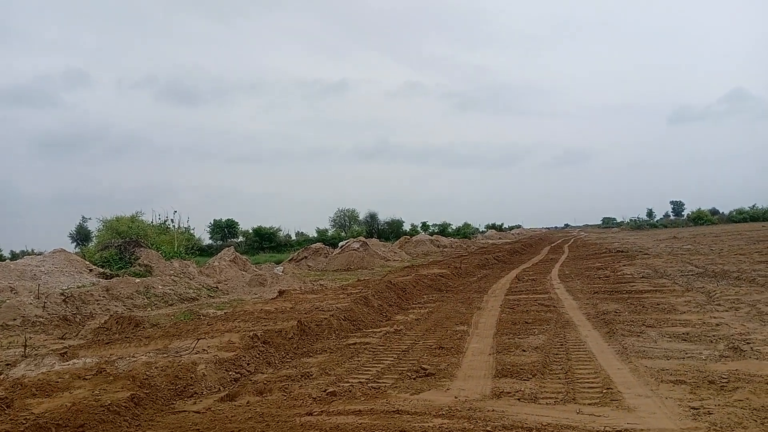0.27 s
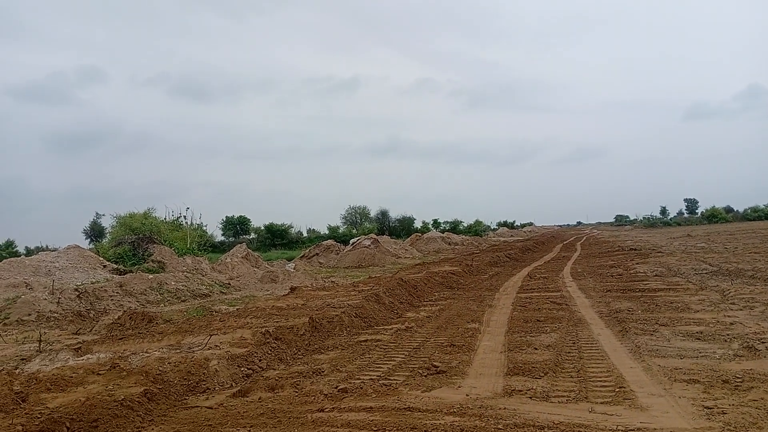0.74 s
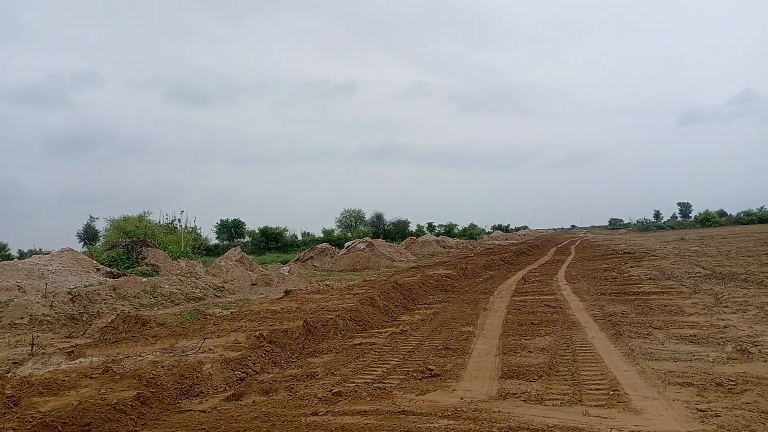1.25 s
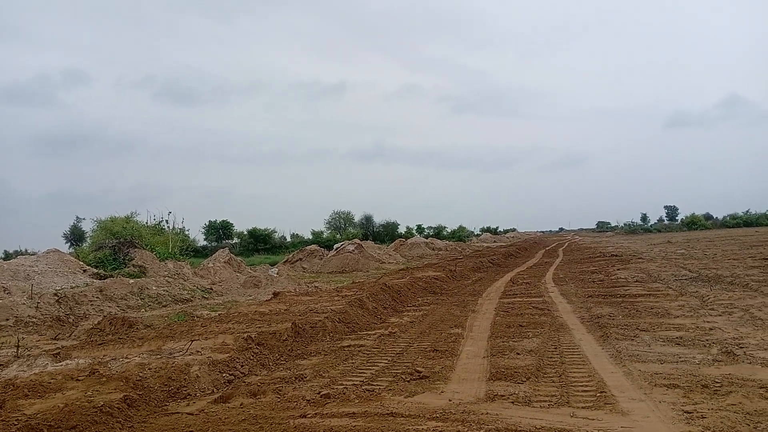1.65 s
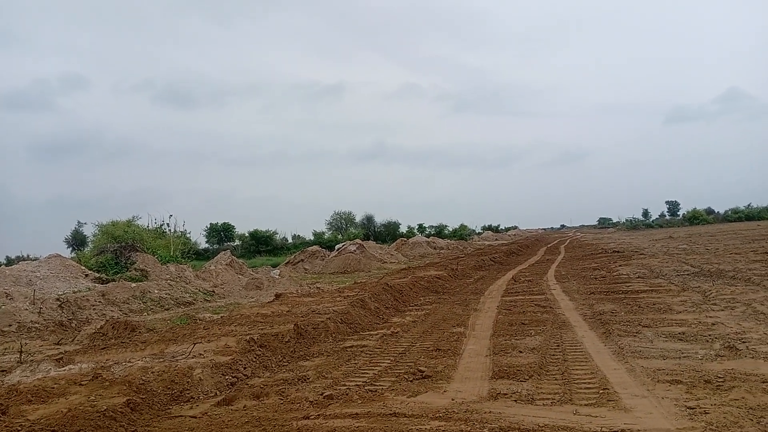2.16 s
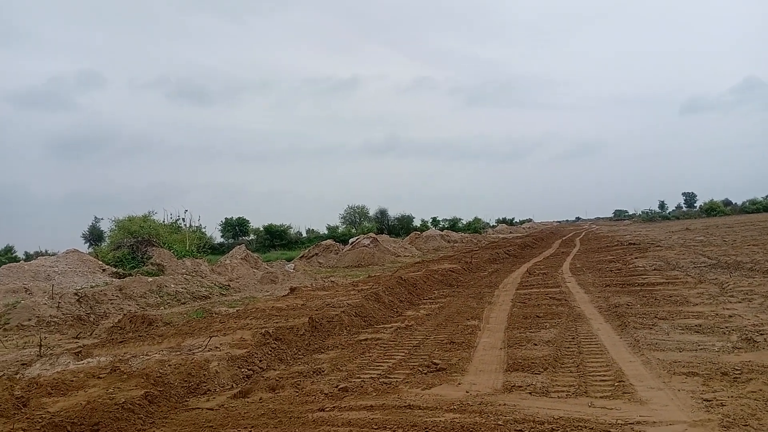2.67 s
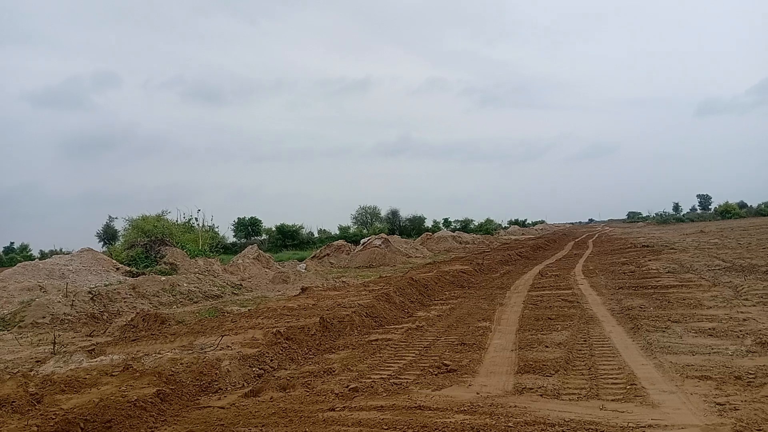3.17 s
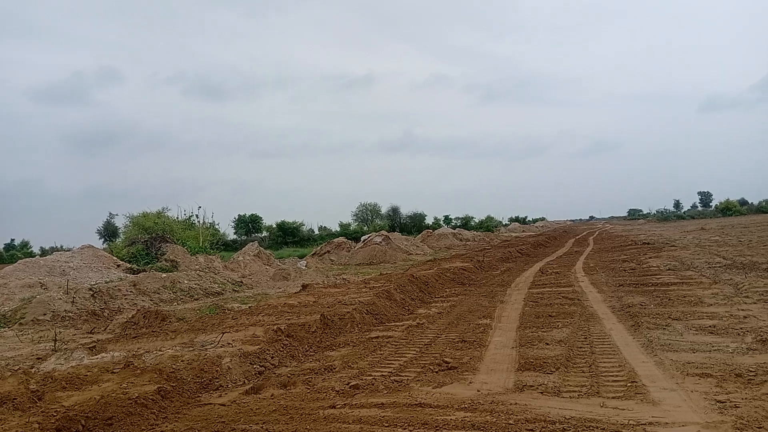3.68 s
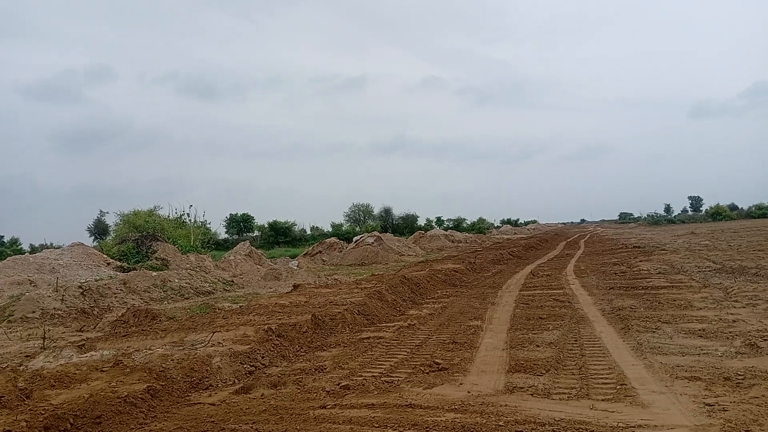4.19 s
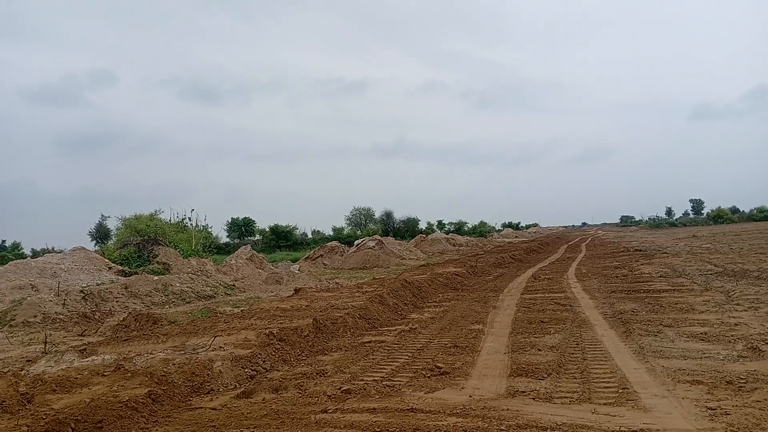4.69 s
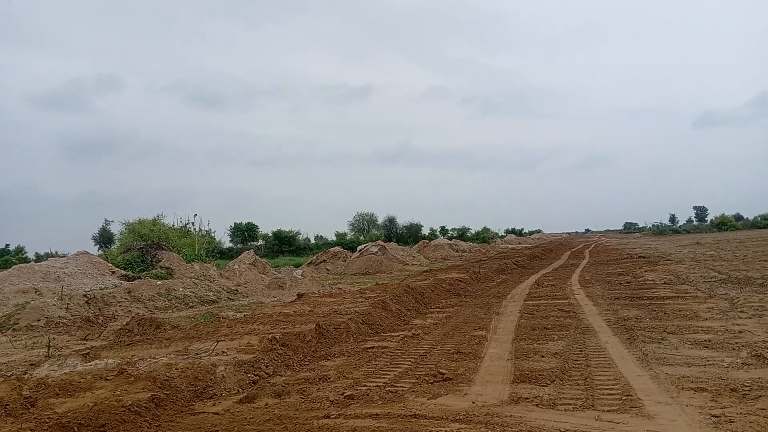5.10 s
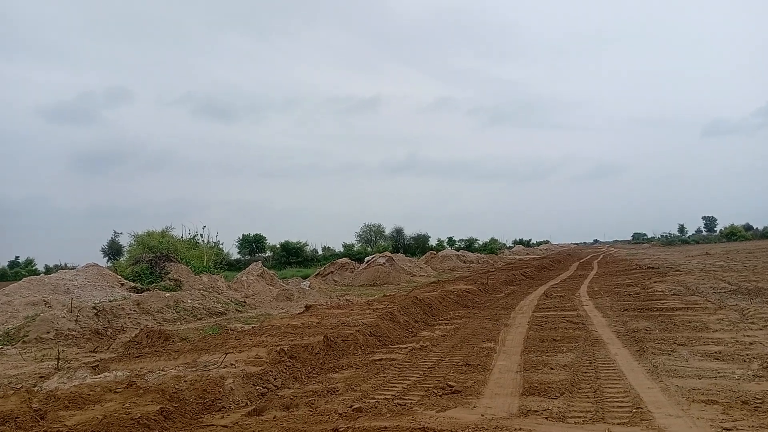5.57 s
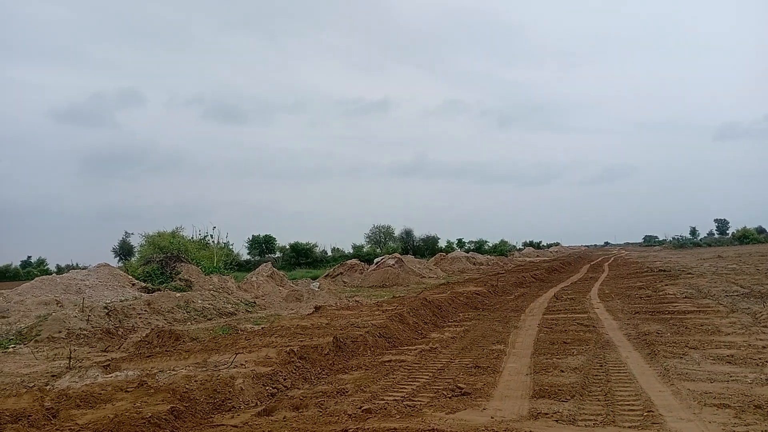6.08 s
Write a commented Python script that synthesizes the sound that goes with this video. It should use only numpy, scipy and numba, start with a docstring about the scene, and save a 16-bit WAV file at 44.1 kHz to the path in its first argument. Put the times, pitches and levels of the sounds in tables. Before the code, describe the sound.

Low rough diesel throb with hissy mechanical clatter, then sharp metallic clanking and rattling in uneven clusters, heard dully across open ground.

```python
"""Tracked earthmover at idle

Uneven diesel firings excite the exhaust resonances, and filtered noise makes the hiss of valve gear
and fan in the hood. Bursts of gritty noise are the crashes of track links and loose steel; they
drive the plates of the frame, some of which ring on as decaying sines. A dull microphone hears it
all, and a steep low-pass leaves nothing above 15.7 kHz."""
import sys
import numpy as np
from scipy import signal
from scipy.fft import rfft, irfft, next_fast_len
from scipy.io import wavfile
from scipy.ndimage import uniform_filter1d, minimum_filter1d
from numba import njit

SR = 44100
rng = np.random.default_rng(int(sys.argv[2]) if len(sys.argv) > 2 else 0)


def transcribe(u):
    """Save the signal u as a 16-bit wav file named by the first command-line argument.

    u: samples, shape (n,) or (channels, n), limited to [-1, 1]; the rate is SR.
    q: integer samples, one column per channel.
    """
    v = np.clip(np.atleast_2d(u).T, -1, 1)
    q = np.round(v * 32767).astype(np.int16)
    wavfile.write(sys.argv[1], SR, q)


N = 279594

# crashes of steel: t/s, level/dB, then trims against it: thud/dB, boom/dB, bite/dB, crack/dB;
# clang f/Hz, rattle t60/s
CRASHES = [(1.097, -28.5, -13.5, -8.5, -8, -8, 1690, 0.089), (1.108, -15, -16, -17.5, -12, 2, 2270, 0.083),
           (1.126, -23.5, -11, -15, -23.5, -6, 785, .3), (1.314, -2.5, -5.5, -22.5, -40, 0, 690, .15),
           (1.358, -12, -20, -17.5, -41, 9.5, 745, .17), (1.481, -6, -12, -11.5, -25, 1, 1580, 0.29),
           (1.522, -15, -21.5, -16, -10, -3, 1070, 0.32), (1.575, -12.5, -22, -23, -0.5, -10.5, 1030, 0.11),
           (1.695, -18.5, -10.5, -17, -2, 3, 1150, 0.23), (1.727, -5.5, -28, -15.5, -7, 1.5, 1730, .19),
           (1.923, -26, -17, -8, -12, -4, 1550, 0.17), (1.946, -26.5, -24.5, -25, -8, 5.5, 1360, 0.12),
           (2.275, -28, -3.5, -21, -14, 3.5, 1760, 0.14), (2.318, -13, -13, -21.5, -26, 11, 1760, .21),
           (2.349, -26, -6.5, -4.5, -7.5, -6.5, 1800, 0.34), (2.382, -6, -27.5, -25.5, -7.5, 2, 1840, 0.13),
           (2.472, -20, -17.5, -14, -18, 5, 1710, 0.18), (2.548, -29, -13, -9.5, 1.5, -3.5, 1640, .22),
           (2.581, -29.5, -9.5, -19.5, -13, -3, 1530, 0.14),
           (2.76, -24.5, -21.5, -1, -23.5, -12, 2050, 0.17), (2.783, -21.5, -14, -23.5, -1.5, 6, 1800, .14),
           (2.825, -15.5, -13.5, -14.5, -33, -10, 1640, 0.4), (2.847, -14.5, -11, -15.5, -4, 3, 2170, 0.2),
           (2.903, -16.5, -28.5, -13.5, -14.5, 2.5, 1940, 0.31),
           (2.972, -18.5, 0.5, -25.5, -4.5, 11.5, 1860, 0.091),
           (3.019, -1, -19, -14, -15, -4.5, 1720, 0.091), (3.032, -3, -19.5, -22, -2, 1, 1103, 0.12),
           (3.071, -12, -7.5, -24.5, 1.5, -5.5, 1650, 0.19), (3.093, -15, -17.5, -20.5, -11, 1, 1880, 0.13),
           (3.118, -20, -14.5, -11, 7.5, 4, 1970, 0.17), (3.327, -12.5, -24.5, -15, -17, -5, 1144, .14),
           (3.344, -10.5, -22, -30.5, -27, -5, 1760, .13), (3.428, -16, -15.5, -11, -11, 0.5, 1920, .14),
           (3.499, -23, -16, -15.5, 0, 2, 1060, .2), (3.549, -21.5, -6.5, -17.5, -18, 0, 1070, 0.17),
           (4.135, -23, -1, -19, -4.5, -3, 1920, 0.084), (4.236, -21.5, -8, -10, -25, 4, 963, 0.54),
           (4.279, -18, -11, -13.5, -25, 5, 1290, 0.13), (4.633, -20.5, -11.5, -5.5, -16, -3, 1530, 0.24),
           (4.726, -15, -15.5, -3.5, -26, -11.5, 970, 0.45), (4.804, -2.5, -30, -10, -19, -17, 1610, 0.16),
           (4.857, -21.5, -3.5, -9.5, -25, -3, 704, .25), (4.966, -13.5, -12.5, -4, -23, 4, 1770, 0.13),
           (4.989, -12, -16.5, -11.5, -32, -13, 1030, 0.12), (5.025, -10, -16, -10, -33, 4.5, 1286, 0.24),
           (5.101, -29, -10.5, -9, -12, 15, 924, 0.92), (5.293, -30, -8.5, 0, -21, -5, 1110, 0.27),
           (5.339, -11, -18, -4, -33, -9, 880, 0.19), (5.43, -12.5, -18.5, -16, -8, 4.5, 870, .3),
           (5.479, -16.5, -21, -7.5, -20, -7, 983, 0.76), (5.513, -9, -30, -10.5, -22.5, 11.5, 730, 0.23),
           (5.639, -10, -10, -5, -23.5, -12, 684, .14), (5.66, -11, -26, -23.5, -15.5, -9, 668, 0.22),
           (5.726, -29.5, -16, -1.5, -26, 8, 614, 0.26), (5.797, -17.5, -17.5, -5.5, -15, -9, 990, .2),
           (5.815, -9.5, -19.5, -13, -18.5, -11, 1160, 0.23), (5.856, -7.5, -17, -20, -10, -1, 630, 0.37),
           (5.874, -15, -16.5, -1.5, -2.5, 13.5, 1840, .13), (5.91, -8, -16, -10, -24.5, -8, 990, .23),
           (5.947, -11, -10, -10.5, -24, 4, 1740, 0.08), (6.029, -6.5, -19.5, -9, -18.5, -11, 593, 0.3),
           (6.079, -6, -20.5, -14.5, -8.5, 11.5, 1790, .24), (6.107, -11, -19, -12.5, -26, 3, 1070, 0.28),
           (6.147, -14.5, -20, -25, -15, 12, 692, 0.44), (6.256, -6, -27.5, -8, 0, -3.5, 1130, 0.075),
           (6.279, -10.5, -23, -22, -10, 0.5, 1234, 0.68), (6.316, -8, -28, -11, -10, 9.5, 1860, .21)]
# modes of the frame and track plates: f/Hz, level/dB, free t60/s
PLATE_MODES = [(155, -4, .2), (217, -5, .2), (241, -6, 1.), (292, -6, .2), (345, -3, .5), (372, -5, 1.),
               (393, -4, .35), (440, -4, .3), (540, -5, .7), (623, -4, .6), (725, -4, .35), (882, -5, .3),
               (1000, -5, .15), (1100, -4, .25), (1150, -6, .3), (1220, -6, .2), (1550, -8, .12),
               (1715, -7, .15), (1900, -6, .12), (2080, -8, .12), (2400, -7, .1), (2690, -7, .18),
               (3000, -9, .07), (3350, -10, .07), (3570, -10, .12), (3800, -12, .08), (3960, -12, .25),
               (4200, -12, .06), (4380, -10, .35), (5250, -12, .08)]


def undb(db):
    """Level to amplitude: 20 dB is a factor of ten."""
    return 10 ** (np.asarray(db) / 20)


def unit(x):
    """Normalization of the root mean square to 1."""
    return x / np.sqrt(np.mean(x ** 2))


@njit
def svf(x, hz, width):
    """Second-order resonance: a state-variable band-pass with gain 1 at the centre."""
    y, band, low = np.empty(len(x)), 0., 0.
    g, damping = np.tan(np.pi * hz / SR), width / hz
    for i in range(len(x)):
        # the tiny offset keeps the state out of denormal numbers
        v = (band + g * (x[i] + 1e-18 - low)) / (1 + g * (g + damping))
        band = 2 * v - band
        low += 2 * g * v
        y[i] = damping * v
    return y


def walk(rate):
    """Slow random fluctuation: normal values held 1 / rate s, smoothed twice; spread near 1."""
    hold = int(SR / rate)
    steps = np.repeat(rng.standard_normal(N // hold + 1), hold)
    return 1.3 * uniform_filter1d(uniform_filter1d(steps, hold), hold)[:N]


def resonate(x, hz, width):
    """Forced resonance: one band-pass applied to x, scaled to unit rms."""
    return unit(svf(x, 1. * hz, 1. * width))


def noise_band(hz, width):
    """Band-limited noise: white noise through the same resonance twice, at unit rms."""
    once = svf(rng.standard_normal(N), 1. * hz, 1. * width)
    return resonate(once, hz, width)


def firings():
    """Jittered pulse train: integrated firing rate gives the phase, each whole turn one pulse."""
    # engine speed: t/s, firing rate f/Hz
    firing_rate = [(0, 73.4), (1.2, 72.6), (1.999, 73.8), (3.001, 75.52), (3.6, 76.26), (4.6, 76.4),
                   (6.34, 75.56)]
    jitter, scatter_db = 0.092, 3.5  # standard deviations: part of a firing interval, dB
    turns = np.cumsum(np.interp(np.arange(N) / SR, *np.transpose(firing_rate))) / SR
    timing, strength = rng.standard_normal((int(turns[-1]), 2)).T
    at = np.searchsorted(turns, np.arange(len(timing)) + jitter * timing)
    pulses = np.zeros(N)
    pulses[at] = undb(scatter_db * strength)
    return turns, pulses


def exhaust(turns, pulses):
    """Source and resonator: firing pulses and gas noise ring the pipe, over wavering engine lines."""
    # pipe resonances: f/Hz, width/Hz, level/dB
    pipe_modes = [(35, 27, -13.5), (72, 42.5, 0), (114, 66, 1.5), (190.2, 50, 0), (450, 25, -11),
                  (617.4, 14, -19)]
    # engine lines: multiple of the firing rate, mean level/dB against the exhaust
    engine_orders = [(1, -7), (6, -14.5)]
    puffs = rng.standard_normal(N) * undb(2.0 * walk(21))
    drive = unit(pulses) + puffs
    pipe = np.zeros(N)
    for k, (hz, width, db) in enumerate(pipe_modes):
        # neighbouring resonances alternate in sign
        pipe += (-1) ** k * undb(db) * resonate(drive, hz, width)
    lines = np.zeros(N)
    for order, db in engine_orders:
        phase = 2 * np.pi * order * turns + .8 * walk(12)
        lines += undb(db + 2 * walk(14)) * np.sin(phase)
    return unit(pipe) + lines


def hood_clatter(pulses):
    """Amplitude modulation: fluctuating noise bands of valve gear and fan throb with the firings."""
    # hood resonances: f/Hz, width/Hz, relative level/dB
    hood_modes = [(334, 830, -2), (736, 470, 2), (1105, 150, 0.5), (1820, 460, 4), (2450, 840, -7.5),
                  (3340, 390, -2.5), (5400, 1300, -3)]
    throb = 1 + 0.12 * resonate(pulses, 75, 75)
    shared = walk(9)
    clatter = np.zeros(N)
    for hz, width, db in hood_modes:
        level_db = db + shared + walk(25)
        clatter += undb(level_db) * resonate(rng.standard_normal(N), hz, width)
    return unit(throb * clatter)


def hood_ring(ring_db):
    """Narrow-band resonance: one fluctuating noise band, ring_db sets its level."""
    # ring of the hood: f/Hz, width/Hz, level/dB before ring_db
    ring_mode = (2590, 510, -11.5)
    hz, width, db = ring_mode
    return undb(db + ring_db + 2.0 * walk(20)) * noise_band(hz, width)


def engine(exhaust_db, hood_db, ring_db):
    """Superposition: one train of firings feeds the exhaust and the throb of the hood."""
    turns, pulses = firings()
    hood = hood_clatter(pulses) + hood_ring(ring_db)
    return undb(exhaust_db) * exhaust(turns, pulses) + undb(hood_db) * hood


def shake():
    """Energy storage: each crash adds power to the hood panels, which decays exponentially."""
    shake_db, shake_t60_s = -25, 0.83  # against the crash level; fade of the clatter
    blows = np.zeros(N)
    for s, db, *_ in CRASHES:
        blows[int(s * SR)] = undb(2 * (db + shake_db))  # squared amplitude
    fade = 1000 ** (-2 / (shake_t60_s * SR))
    return signal.lfilter([1], [1, -fade], blows)


def rings():
    """Free vibration: single plates decay as sines, wavering as loose parts touch them."""
    # clear rings: t/s, plate f/Hz, level/dB
    ring_events = [(1.097, 3800, -26), (1.109, 3350, -17.5), (1.116, 2400, -25), (1.32, 372, -22),
                   (1.319, 540, -24), (1.32, 623, -18.5), (1.32, 725, -16.5), (1.33, 882, -17.5),
                   (1.358, 3000, -12), (1.358, 2690, -24), (1.49, 372, -21), (1.53, 440, -15),
                   (1.529, 1100, -20), (1.555, 393, -20), (1.578, 2690, -18.5), (1.521, 3350, -16),
                   (1.697, 2690, -24), (1.735, 3570, -12.5), (1.729, 440, -32.5), (1.73, 623, -26),
                   (1.729, 1715, -23), (2.351, 2690, -22), (2.386, 2400, -7), (2.388, 3570, -14),
                   (2.389, 4200, -10), (2.974, 3350, -13), (2.973, 4200, -15), (3.03, 372, -24.5),
                   (3.43, 1900, -21.5), (4.282, 4380, -31), (4.283, 3960, -30), (4.739, 4200, -17),
                   (4.809, 345, -17.5), (4.812, 393, -22.5), (4.966, 3000, -15.5), (5.035, 4380, -32.5),
                   (4.985, 393, -22.5), (5.03, 345, -21), (5.35, 393, -22), (5.35, 882, -25),
                   (5.44, 4380, -27), (5.519, 241, -14), (5.519, 5250, -15), (5.66, 623, -20),
                   (5.66, 5250, -18), (5.88, 345, -12), (5.877, 5250, -7), (5.9, 540, -22),
                   (6.04, 623, -14), (6.082, 2400, -15.5), (6.111, 393, -11.5), (6.15, 4380, -22.5),
                   (6.259, 1220, -10), (6.318, 2690, -10)]
    out, waver = np.zeros(N), undb(2.0 * walk(110))
    for s, plate_hz, db in ring_events:
        hz, _, t60 = min(PLATE_MODES, key=lambda plate: abs(plate[0] - plate_hz))
        a = int(s * SR)
        t = np.arange(min(int(t60 * SR), N - a)) / SR
        envelope = (1 - np.exp(-t / 0.0018)) * 1000 ** (-t / t60)
        out[a:a + len(t)] += undb(db) * envelope * np.sin(2 * np.pi * hz * t)
    return out * waver


def loose_knocks():
    """Random impacts: loose links knock at chance times, each knock decaying over a steady floor."""
    knock_rate, decay_s, share = 130, 0.0053, 0.057  # knocks per s, time constant, amount over the floor
    struck = rng.random(N) < knock_rate / SR
    knocks = undb(0.5 * rng.exponential(size=N)) * struck
    decaying = signal.lfilter([1], [1, -np.exp(-1 / (decay_s * SR))], knocks)
    return unit(1 + share * decaying)


def ring_plates(strikes):
    """Modal response: each strike signal drives the resonance of its own plate."""
    out = np.zeros(N)
    for (hz, db, t60), strike in zip(PLATE_MODES, strikes):
        # bandwidth follows from t60; loose parts damp the long rings
        width = np.log(1000) / np.pi / min(t60, .3)
        out += undb(db - 31) * np.sqrt(SR / width) * svf(strike, 1. * hz, width)
    return out


def clanks():
    """Impact excitation: each crash is a crack, a rattle in several bands and a strike on the plates."""
    rise_s, edge_rise_s, crack_t60 = 0.0059, 0.0039, 0.022  # s
    edge_db, plate_db = -2.5, 3  # edge against bite, strike against crash
    boom_stretch, strike_share = 1.86, 0.75  # fade times against the rattle t60
    usual_hz, pitch_spread = np.array([390, 2600]), [0.19, 0.049]  # boom, bite; log-frequency deviation
    grit = loose_knocks()
    thud, boom = noise_band(134.6, 160), noise_band(374, 380)
    body, bite, edge = noise_band(920, 1800), noise_band(2880, 3400), noise_band(5560, 2800)
    wide = rng.standard_normal(N)
    count = len(CRASHES)
    spots_db = 3 * rng.standard_normal((count, len(PLATE_MODES)))  # each blow lands elsewhere
    links_hz = 600 * 8 ** rng.random((count, 16))  # other loose links shake at each blow
    pitches = usual_hz * np.exp(pitch_spread * rng.standard_normal((count, 2)))
    plate_hz = np.array(PLATE_MODES)[:, 0]
    out, strikes = np.zeros(N), np.zeros((len(PLATE_MODES), N))
    for crash, spot_db, link_hz, (boom_hz, bite_hz) in zip(CRASHES, spots_db, links_hz, pitches):
        s, db, thud_db, boom_db, bite_db, crack_db, clang_hz, t60 = crash
        a, t60 = int(s * SR), np.clip(t60, .02, 1)
        t = np.arange(min(int(1.2 * t60 * SR), N - a)) / SR
        cut = slice(a, a + len(t))
        attack = 1 - np.exp(-t / rise_s)
        rattle = grit[cut] * attack * 1000 ** (-t / t60)
        crack = undb(crack_db) * np.tanh(t / 0.001) * 1000 ** (-t / crack_t60)

        # the part that is hit lends its own pitches to the rattle
        hum, clang, ting = (svf(wide[cut], 1. * hz, share * hz) * np.sqrt(SR / hz)
                            for hz, share in ((boom_hz, .15), (clang_hz, .1), (bite_hz, .05)))
        low = undb(thud_db - 0.5) * thud[cut]
        low += undb(boom_db) * (undb(-2.5) * boom[cut] + undb(1.0) * hum)
        high = undb(-9.5) * body[cut] + undb(-3.5) * clang
        high += undb(bite_db) * (undb(-2.0) * bite[cut] + undb(-13.5) * ting)
        # the highest rattle builds up after the blow
        high += undb(bite_db + edge_db) * (1 - np.exp(-t / edge_rise_s)) * edge[cut]
        # part of the rattle passes through the short rings of the links
        high = .7 * high + 1.5 * sum(svf(high, hz, .025 * hz) for hz in link_hz)
        low_fade = attack * 1000 ** (-t / (boom_stretch * t60))
        out[cut] += undb(db) * (low * low_fade + (rattle + crack) * high)

        blow = attack * 1000 ** (-t / (strike_share * t60)) * wide[cut]
        # boomy blows reach the big plates, biting ones the small links
        lean_db = np.interp(np.log(plate_hz), np.log([400, 1200, 3500]), [boom_db + 15.5, 0, bite_db + 6])
        strikes[:, cut] += undb(db + plate_db + lean_db + spot_db)[:, None] * blow
    return out + ring_plates(strikes)


def scene():
    """Linear superposition of engine, crashes and rings; shaken hood power adds to the clatter."""
    # engine load: t/s, exhaust level/dB, hood clatter level/dB, hood ring trim against clatter/dB
    load = [(0, -30.5, -37, 3), (.25, -36, -37.5, 1), (.55, -32, -36.5, 1), (1.25, -33.5, -38, 2),
            (2.2, -32, -41, 5), (2.7, -34.5, -37, 0.5), (3.3, -30.5, -30.5, 5.5), (4.15, -31.5, -34.5, 7),
            (4.9, -28.5, -28, 2), (5.2, -29, -34.5, -1), (6.34, -35, -25.5, -8.5)]
    s, *columns = np.transpose(load)
    exhaust_db, hood_db, ring_db = (np.interp(np.arange(N) / SR, s, c) for c in columns)
    shaken_db = 10 * np.log10(1 + shake() / undb(2 * hood_db))
    # the crashes lift the clatter but leave the hood ring at its own level
    running = engine(exhaust_db, hood_db + shaken_db, ring_db - shaken_db)
    return (running + clanks() + rings())[None]


def record(dry):
    """Spectral weighting, peak limiting, faint hiss and a steep low-pass: dull, nothing above 15.7 kHz."""
    # microphone response: f/Hz, gain/dB
    mic_response = [(20, -18.5), (50, -11.5), (70, -2), (2800, -3), (4000, -12), (5000, -24.5), (6000, -36),
                    (7500, -47.5), (11500, -36), (16000, -62)]
    ceiling, hiss_db, top_hz = .88, -85, 15700  # limiter amplitude, hiss before the low-pass, its edge
    size = next_fast_len(N + SR // 4)
    hz = np.maximum(np.arange(size // 2 + 1) * SR / size, 1)
    mic_hz, mic_db = np.transpose(mic_response)
    gain = undb(np.interp(np.log(hz), np.log(mic_hz), mic_db))
    heard = irfft(rfft(dry, size) * gain, size)[:, :N]
    # the gain dips around each peak and is smoothed over 111 samples
    needed = ceiling / np.maximum(np.abs(heard), ceiling)
    heard = heard * uniform_filter1d(minimum_filter1d(needed, size=221), size=111)
    heard = heard + undb(hiss_db) * rng.standard_normal((1, N))
    return signal.sosfilt(signal.ellip(8, .2, 70, top_hz, fs=SR, output="sos"), heard)


dry = scene()
out = record(dry)
transcribe(out)
```